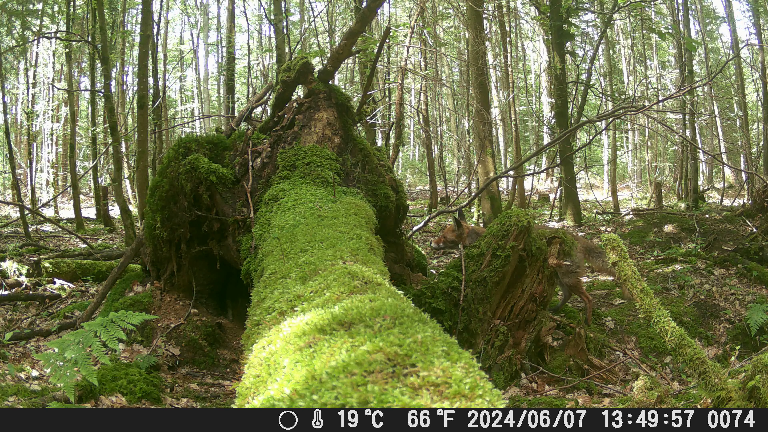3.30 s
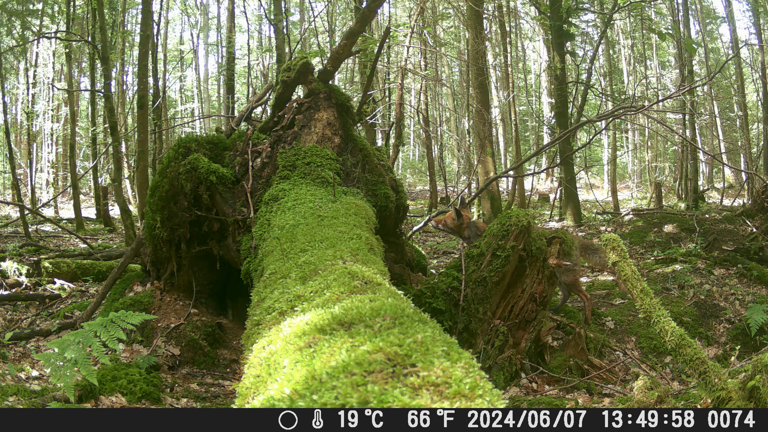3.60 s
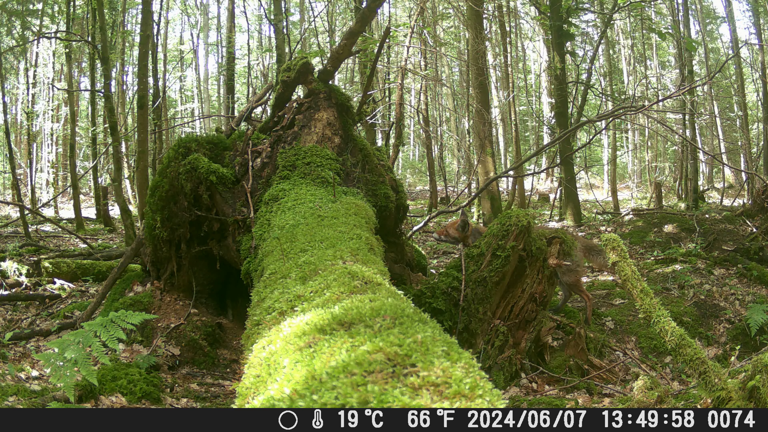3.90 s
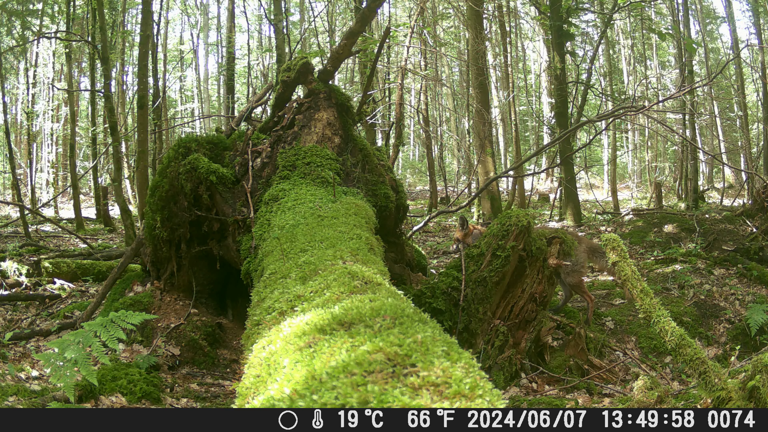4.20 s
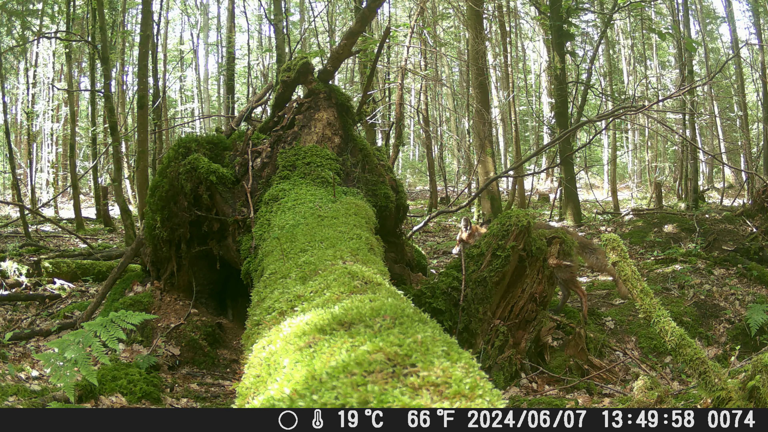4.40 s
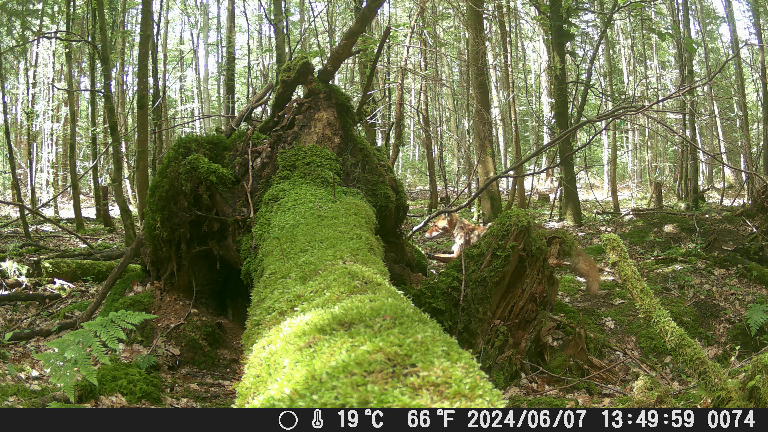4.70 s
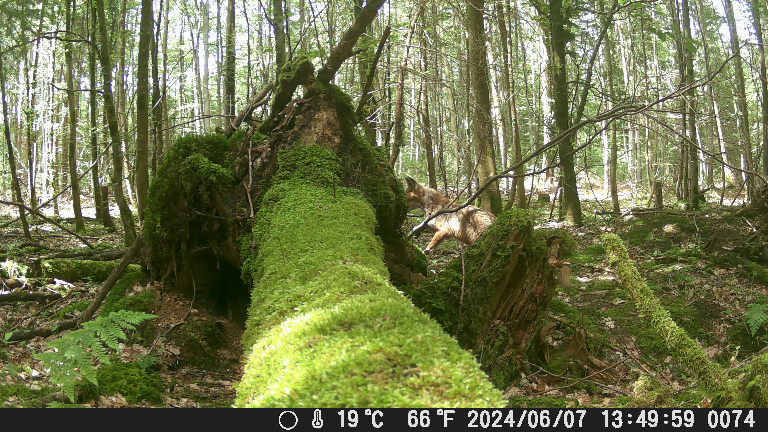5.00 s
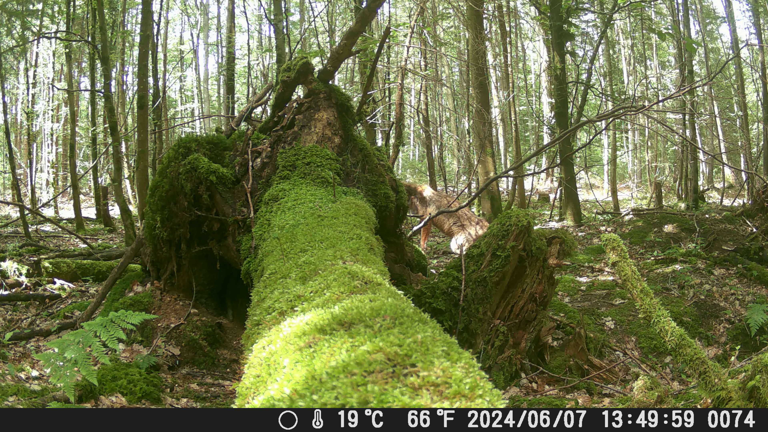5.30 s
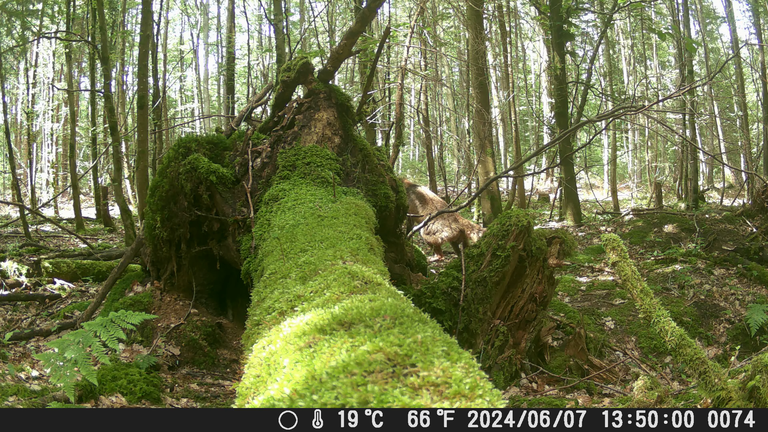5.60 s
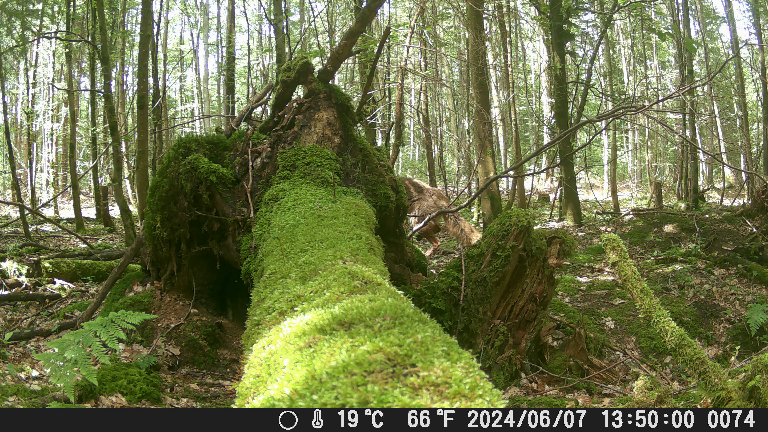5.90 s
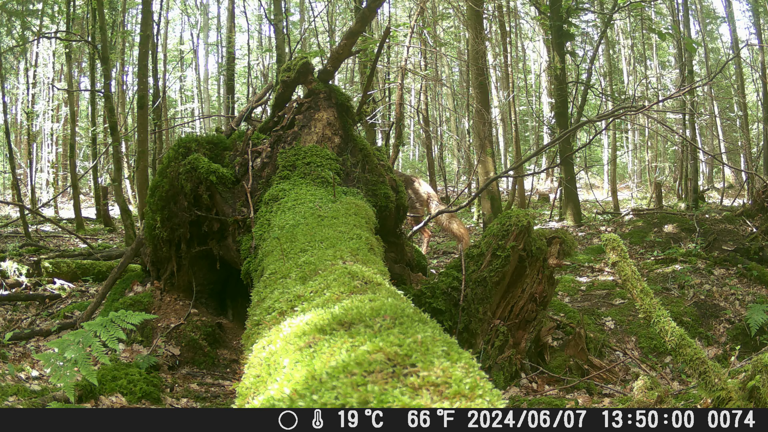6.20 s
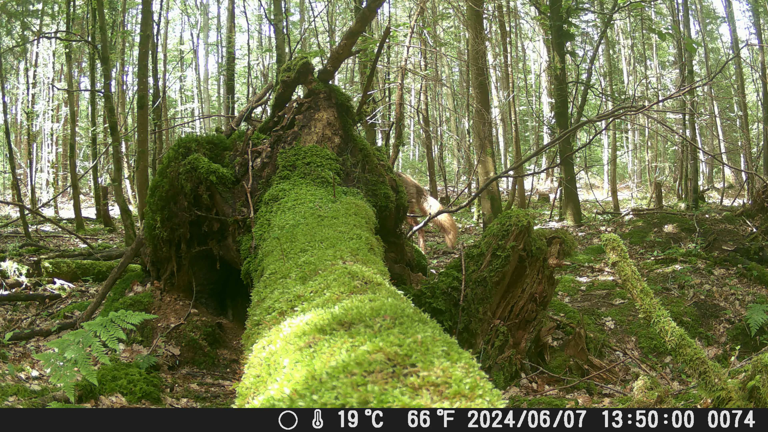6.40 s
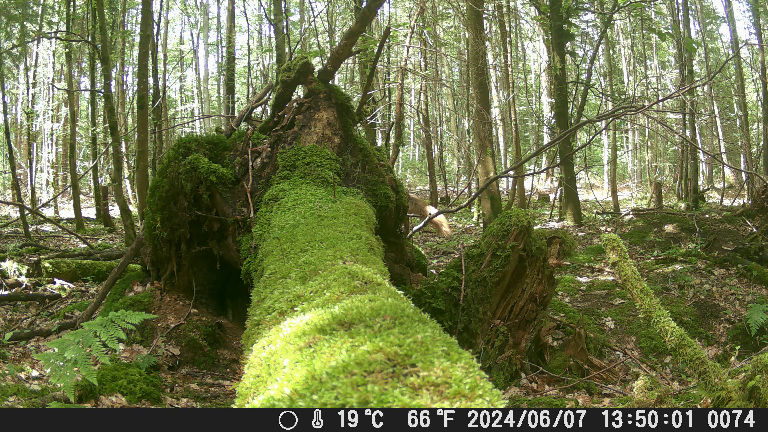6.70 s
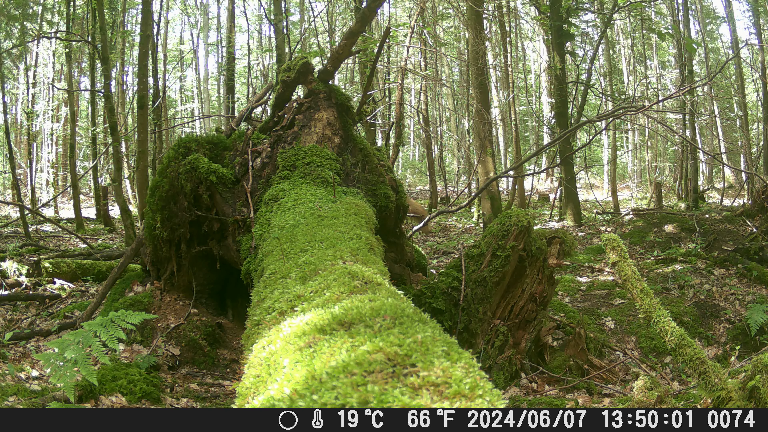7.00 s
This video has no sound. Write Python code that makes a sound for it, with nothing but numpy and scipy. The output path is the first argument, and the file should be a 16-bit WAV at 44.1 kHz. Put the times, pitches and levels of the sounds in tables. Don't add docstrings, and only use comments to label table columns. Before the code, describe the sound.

A small bird close by scolds in dry, rattling bursts while a fainter one answers in the gaps, over soft leaf hiss in a forest.

```python
import sys
import numpy as np
from scipy import signal
from scipy.fft import rfft, irfft
from scipy.io import wavfile
from scipy.ndimage import uniform_filter1d

SR = 44100
rng = np.random.default_rng(int(sys.argv[2]) if len(sys.argv) > 2 else 0)


def persist_wave(psi):
    counts = np.round(np.clip(psi, -1, 1) * 32767).astype(np.int16)
    wavfile.write(sys.argv[1], SR, np.atleast_2d(counts).T)


def amplitude_ratio(level_db):
    exponent = np.asarray(level_db, float) / 20
    return 10 ** exponent


N = 314433

# pitch_hz, level_db (per Hz)
HISS_COLOUR = [(15, -7), (30, -4), (52, 0.5), (75, -8), (250, -16.5), (500, -20), (1000, -23.5),
               (2000, -27), (3300, -33.5), (4300, -41.5), (5300, -46.5), (6800, -27.5), (8200, -42),
               (9600, -68)]
HISS_DB = -71

# time_ms from its start, pitch_hz, level_db
NEAR_NOTE = [
    (-3, 7900, -21),
    (-1.67, 7700, -2.5),
    (1.39, 6900, -1.5),
    (3.5, 5900, -3.5),
    (6, 4300, -0.5),
    (9.5, 2900, -7),
    (15, 1200, -18.5),
]
FAR_NOTE = [
    (-2, 7900, -24),
    (-0.5, 7800, -3),
    (1.87, 6100, 1.5),
    (3.5, 4900, -7.5),
    (6, 4000, -1.5),
    (9, 3600, -3.5),
    (12, 1600, -11.5),
    (17, 1700, -18.5),
]

# start_s, level_db (peak)
NEAR_BURSTS = [(0.0961, -34), (0.1285, -32.5), (0.184, -30.5), (0.232, -30.5), (0.2862, -31), (0.327, -31),
               (0.3809, -31.5), (0.4213, -32), (0.4712, -30), (0.5186, -31.5), (0.5668, -28.5),
               (0.6286, -30), (0.6696, -29.5), (0.7194, -31), (0.7631, -30.5),
               (1.3175, -33), (1.3503, -31), (1.4058, -29.5), (1.444, -30), (1.492, -29.5),
                (1.5371, -28.5), (1.5788, -29), (1.6207, -28.5), (1.6871, -28.5), (1.7239, -28.5),
                (1.7734, -28.5), (1.8156, -29), (1.8749, -29), (1.9153, -29),
               (2.0079, -29.5), (2.0428, -30), (2.1163, -31), (2.1541, -31), (2.3119, -32.5),
                (2.3438, -32), (2.4229, -31.5), (2.4615, -30), (2.5741, -29.5), (2.6093, -28.5),
                (2.6599, -29), (2.7075, -30), (2.7672, -29), (2.811, -28.5),
               (3.2116, -35), (3.241, -30.5), (3.2946, -28.5), (3.3459, -28.5), (3.4014, -29),
              (3.4455, -27.5), (3.492, -28), (3.5349, -29), (3.5778, -28), (3.6239, -28.5), (3.6704, -29.5),
              (3.712, -28.5), (3.7611, -29.5), (3.8113, -28.5), (3.87, -27.5), (3.9208, -27.5),
              (3.965, -26), (4.0128, -26.5),
               (4.4491, -31), (4.4815, -31), (4.5338, -30), (4.5721, -29), (4.6438, -30.5), (4.6835, -29.5),
               (4.727, -29), (4.7725, -28), (4.8186, -27.5), (4.8673, -27.5), (4.9092, -27.5),
               (4.9567, -27), (5.001, -29.5),
               (5.6108, -32), (5.6446, -31), (5.688, -30.5), (5.7313, -30.5), (5.7735, -29.5),
               (5.8223, -30), (5.8593, -29), (5.903, -30.5), (5.9421, -30.5), (5.986, -32), (6.0273, -32),
               (6.0697, -30), (6.1657, -32.5), (6.1982, -31), (6.2472, -31), (6.2881, -29.5), (6.337, -32),
               (6.4065, -34), (6.4511, -33), (7.0124, -36.5), (7.0425, -34), (7.087, -34.5), (7.126, -37)]
# start_s, level_db (peak)
FAR_ANSWERS = [(0.818, -43.5), (0.8467, -40.5), (0.8771, -40), (0.9113, -43), (0.9468, -42.5),
               (0.9813, -40), (1.0181, -43.5), (1.0586, -43), (1.0961, -42), (1.1363, -42.5),
               (1.179, -43.5), (2.5077, -47.5), (2.533, -46), (2.847, -40), (2.8875, -41),
               (2.9412, -39.5), (2.9805, -41.5),
               (4.063, -67), (4.0881, -52), (4.123, -51.5), (4.156, -51.5), (4.1905, -48.5),
                (4.2412, -45.5), (4.2768, -47), (4.315, -54), (4.356, -51), (4.3952, -51), (4.434, -52),
                (5.3653, -49), (5.3948, -45.5), (5.4242, -45), (5.4595, -45), (5.4966, -44.5),
                (5.5358, -44), (5.571, -43.5), (5.806, -43.5), (5.853, -42.5)]

# start_s, bounce_delay_ms off the ground, bounce_db, note length factor
HOPS = [
    (0, 2.8, -2.5, 1.18),
    (1.3, 2.4, -2, 1.113),
    (2.0, 2.58, -2, 1.16),
    (2.56, 2.43, -7.5, 1.17),
    (3.2, 2.32, -2, 1.22),
    (3.6, 2.76, -1.5, 1.27),
    (4.44, 3.2, -4.5, 1.1),
    (5.6, 3.51, -2.5, 0.93),
    (6.15, 2.77, -5.5, 1.06),
    (7.0, 1.87, -6.5, 1.17),
]
# start_s, top_db, low_db, foot_db (extra at the bottom of the fall)
NEAR_AIM = [(.1, -9, -.5, 1.5), (.35, 1.5, -1.5, 1), (.6, -3, -1, -0.5), (1.32, -5, -1, 1),
            (1.62, -3, -6.5, 0.5), (1.85, 0.5, -2.5, -1), (2.33, -3, 2.5, -1), (2.65, -4.5, -4, 0.5),
            (3.22, -7.5, 0.5, 2.5), (3.45, 0.5, -4, 1.5), (3.7, 2, -4.5, 1), (4.0, -0.5, -5, 0),
            (4.46, -2.5, -1, -1.5), (4.95, -1, -5, -3.5), (5.62, -5.5, -1.5, -3), (5.85, -4.5, -6, -6.5),
            (6.3, -4.5, -3.5, -3.5), (7.08, -9, 0.5, -2)]
FAR_AIM = [
    (.82, -4, 6.5, 0),
    (1.0, -1.5, 5, 3),
    (1.18, -2.5, 1.5, 0),
    (2.9, -6, -5, 1.5),
    (4.1, -5, 6.5, -2),
    (4.24, -8.5, 1, -1.5),
    (4.4, -1.5, 8, -1),
    (5.45, -3.5, 0.5, -7),
    (5.83, 0.5, 1.5, -3),
]

# start_s, length_s, first_hz, last_hz
WHISTLES = [(.6, .35, 3750, 3720), (1.0, .3, 3720, 3680), (1.72, .18, 3450, 3400), (1.9, .13, 2950, 2950),
            (1.94, .06, 1750, 1720), (2.05, .25, 2680, 2550), (2.86, .3, 3700, 3600),
            (3.09, .09, 1985, 2025), (3.15, .09, 2020, 2045), (3.26, .15, 1980, 1850),
            (3.4, .2, 2450, 2440), (4.2, .15, 1980, 1900), (4.48, .3, 2750, 2750), (4.78, .2, 1950, 1960),
            (4.88, .3, 2335, 2330), (5.25, .3, 2340, 2330), (5.88, .2, 1870, 1850), (6.25, .15, 2500, 2450),
            (6.41, .17, 2368, 2366), (6.69, .1, 3295, 3290), (6.86, .07, 2370, 2368)]
WHISTLES_DB = [-89.5, -89, -85, -81, -81.5, -83, -89.5, -84, -74.5, -85.5, -87, -82.5, -83, -82, -82.5,
               -92.5, -87.5, -89, -74.5, -86, -79]
WARBLES_HZ = [70, 70, 80, 60, 30, 80, 90, 15, 15, 90, 25, 60, 55, 70, 18, 18, 35, 25, 5, 8, 25]

# pitch_hz, level_db
LEAVES = [(7200, 0), (8600, -4)]
# pitch_hz, level_db
PORT = [(300, -38), (2000, -25), (4000, -25.5), (5100, -22), (5800, -10.5), (6300, -1.5), (6900, -0.27),
        (7500, -6.5), (7900, -13.5), (8600, -19), (9100, -33), (9600, -74.5)]

PERCHES = 4
NOTE_SAMPLES = 2200
SCOLD = NEAR_BURSTS
SCOLD_S = np.array([s for s, _ in SCOLD])
OPENS_RUN = np.diff(SCOLD_S, prepend=-1) > .07


def colour(x, points):
    hz, db = np.transpose(points)
    size = 8192
    grid = np.maximum(np.fft.rfftfreq(size, 1 / SR), 1)
    cepstrum = irfft(np.log(amplitude_ratio(np.interp(np.log(grid), np.log(hz), db))))
    cepstrum[1:size // 2] *= 2
    cepstrum[size // 2 + 1:] = 0
    response = irfft(np.exp(rfft(cepstrum)))
    return signal.fftconvolve(x, response)[:len(x)]


def drift(noise, span):
    smooth = uniform_filter1d(uniform_filter1d(noise, span), span)
    return smooth * np.sqrt(1.35 * span)


def hiss():
    breathing = amplitude_ratio(1.6 * drift(rng.standard_normal(N), 9000))
    air = colour(rng.standard_normal(N), HISS_COLOUR) * breathing
    return air * amplitude_ratio(HISS_DB) / np.std(air)


def head_aim(aim, s):
    turns, tops_db, lows_db, feet_db = np.transpose(aim)
    top_db = np.interp(s, turns, tops_db) + 1.5 * rng.standard_normal()
    low_db = np.interp(s, turns, lows_db) + 1.17 * rng.standard_normal()
    return top_db, low_db, np.interp(s, turns, feet_db)


def falling_note(shape, stretch, aim_db, overtones_db, rasp):
    ms, hz, db = np.transpose(shape)
    top_db, low_db, foot_db = aim_db
    t = ms[0] + np.arange(NOTE_SAMPLES) * 1e3 / SR / stretch
    wobble = 1 + .02 * drift(rng.standard_normal(NOTE_SAMPLES), 30)
    pitch = np.exp(np.interp(t, ms, np.log(hz))) * wobble
    phase = 2 * np.pi * np.cumsum(pitch) / SR
    second_voice = np.sin(1.14 * phase + 9 * rng.standard_normal())
    tone = amplitude_ratio(top_db - 3) * np.clip((3.5 - t) / 3, 0, 1) * second_voice
    beak_hz = [2900, 3650, 5120, 5680, 7150, 7560, 9600, 10800]
    beak_db = [low_db + foot_db, low_db, low_db, 0, 0, top_db, top_db, -60]
    for k, over_db in enumerate((0, *overtones_db), 1):
        tone = tone + amplitude_ratio(over_db + np.interp(k * pitch, beak_hz, beak_db)) * np.sin(k * phase)
    closing = np.clip((t + 3) / 6, 0, 1)
    rough = 1 + rasp * closing * drift(rng.standard_normal(NOTE_SAMPLES), 12)
    return tone * rough * amplitude_ratio(np.interp(t, ms, db, right=-200))


def twigs(x, twig_db, bounce_ms, bounce_db):
    bounce_ms = bounce_ms + .2 * rng.standard_normal()
    bounce_db = bounce_db + 1.2 * rng.standard_normal()
    bounce = np.roll(x, int(bounce_ms * SR / 1e3)) * amplitude_ratio(bounce_db)
    t = np.arange(len(x)) / SR
    hits = rng.standard_normal(len(x)) * (rng.random(len(x)) < .04) * (t > .0012)
    echo = hits * amplitude_ratio(twig_db - 60 * t / 0.052)
    return x + bounce + signal.fftconvolve(np.diff(x, prepend=0), echo)[:len(x)]


def add_note(out, voice, start_s, peak_db):
    at = int(start_s * SR)
    out[at:at + len(voice)] += amplitude_ratio(peak_db) * voice / np.abs(colour(voice, PORT)).max()


def trunks(x, early_db, early_t60, late_db, late_t60):
    t = np.arange(SR * 2) / SR
    sparse = rng.standard_normal(len(t)) * (rng.random(len(t)) < .03)
    dense = colour(rng.standard_normal(len(t)), LEAVES)
    early = amplitude_ratio(early_db - 60 * t / early_t60) * sparse
    late = amplitude_ratio(late_db - 60 * t / late_t60) * dense
    echo = np.clip((t - .0012) / 0.00099, 0, 1) * (early + late)
    echo[0] = 1
    return signal.fftconvolve(x, echo)[:N]


def near_wren():
    out = np.zeros((PERCHES, N + 4096))
    for (s, db), first, run in zip(SCOLD, OPENS_RUN, np.cumsum(OPENS_RUN)):
        _, bounce_ms, bounce_db, slow = [hop for hop in HOPS if hop[0] <= s + .05][-1]
        stretch = (1 + .03 * rng.standard_normal()) * slow * (.82 if first else .97)
        top_db, low_db, foot_db = head_aim(NEAR_AIM, s)
        if first:
            top_db = top_db - 3
        voice = falling_note(NEAR_NOTE, stretch, (top_db, low_db, foot_db), (-6, -6), rasp=.55)
        voice = twigs(voice, -12, bounce_ms, bounce_db)
        add_note(out[run % PERCHES], voice, s + NEAR_NOTE[0][0] * stretch / 1e3, db)
    return sum(trunks(perch[:N], -22, 0.081, -47, 0.53) for perch in out)


def whistles():
    out = np.zeros(N + SR)
    for (s, length, first_hz, last_hz), db, warble_hz in zip(WHISTLES, WHISTLES_DB, WARBLES_HZ):
        u = np.linspace(0, 1, int(length * SR))
        pitch_waver, level_waver = drift(rng.standard_normal((2, SR)), 500)[:, :len(u)]
        pitch = first_hz + (last_hz - first_hz) * u + warble_hz * pitch_waver
        phase = 2 * np.pi * np.cumsum(pitch) / SR
        swell = np.sin(np.pi * u ** .45) ** .6
        out[int(s * SR):][:len(u)] += amplitude_ratio(db + 2 * level_waver) * swell * np.sin(phase)
    return trunks(out[:N], -20.0, .2, -34.5, 1.0)


def far_wren():
    out = np.zeros((PERCHES, N + 4096))
    for s, db in FAR_ANSWERS:
        run = OPENS_RUN[SCOLD_S < s].sum()
        stretch = 0.92 * (1 + .03 * rng.standard_normal())
        voice = falling_note(FAR_NOTE, stretch, head_aim(FAR_AIM, s), (-3, -9), rasp=.45)
        voice = twigs(voice, -15, 1.6, -9)
        add_note(out[run % PERCHES], voice, s + FAR_NOTE[0][0] * stretch / 1e3, db)
    return sum(trunks(perch[:N], -21, 0.053, -40.0, 0.39) for perch in out)


def scene():
    background = hiss()
    wrens = near_wren() + far_wren()
    return (background + colour(wrens, PORT) + whistles())[None]


def roll_off(x):
    return signal.sosfilt(signal.butter(12, 9130, fs=SR, output="sos"), x)


def record(dry):
    # pitch_hz, level_db of the bent part
    knock = [(20, -24.5), (150, 13.0), (500, 10.0), (1000, 18), (1500, 17.0), (2200, -5.5), (4000, -47.5)]
    bent = colour(dry[0] ** 2, knock)
    return roll_off(dry + bent)


dry = scene()
out = record(dry)
persist_wave(out)
```